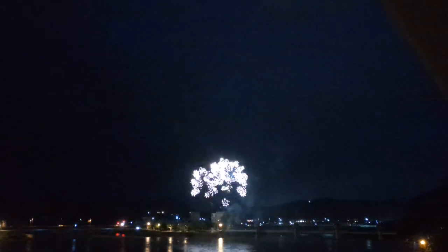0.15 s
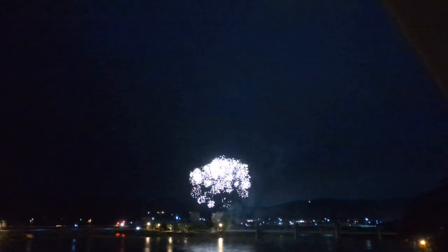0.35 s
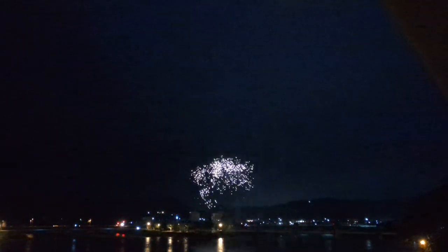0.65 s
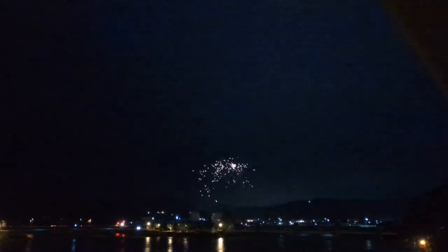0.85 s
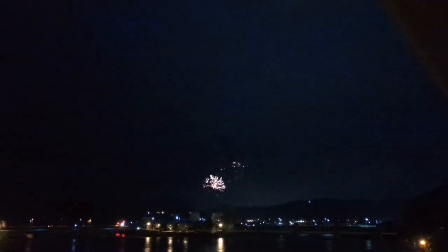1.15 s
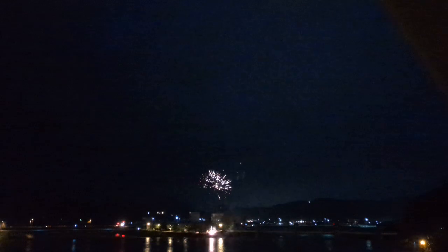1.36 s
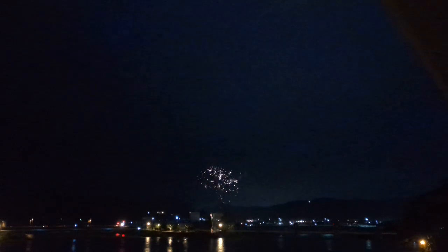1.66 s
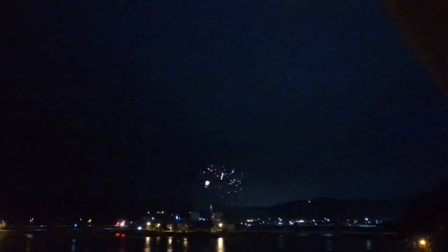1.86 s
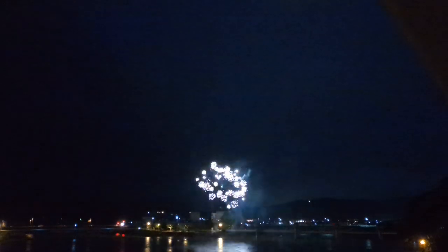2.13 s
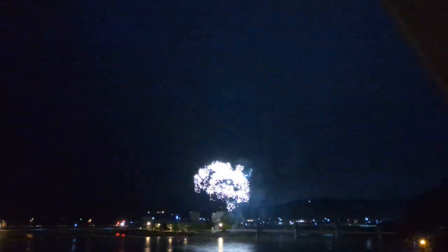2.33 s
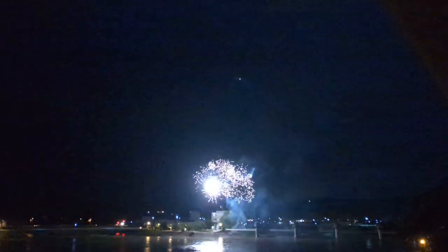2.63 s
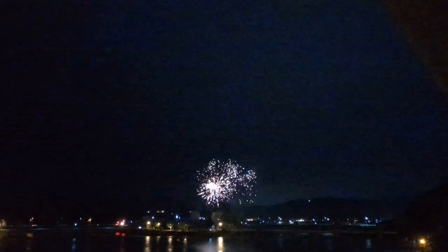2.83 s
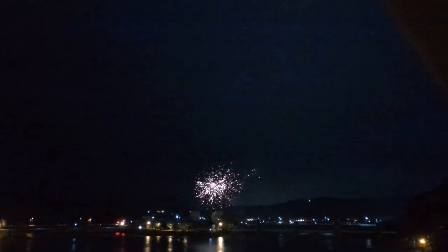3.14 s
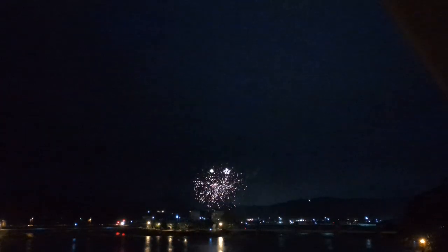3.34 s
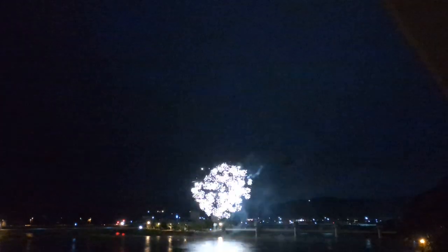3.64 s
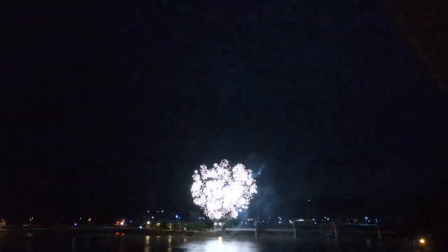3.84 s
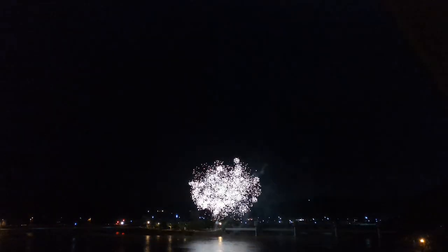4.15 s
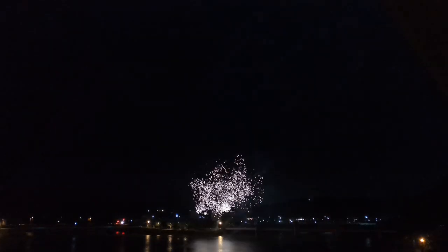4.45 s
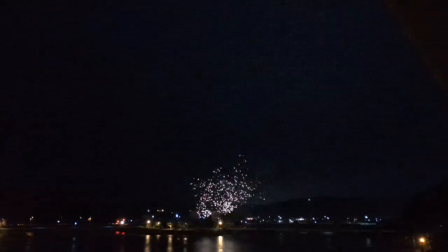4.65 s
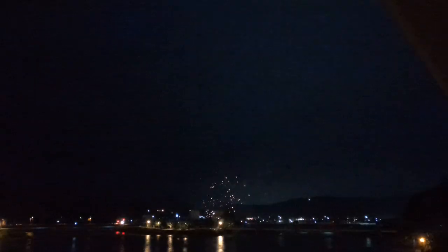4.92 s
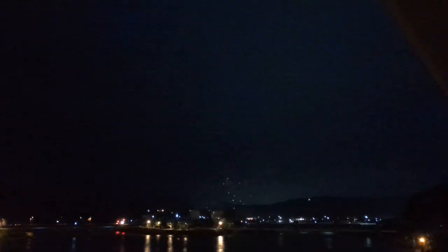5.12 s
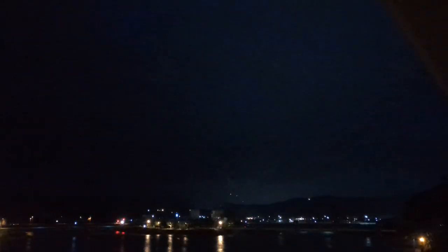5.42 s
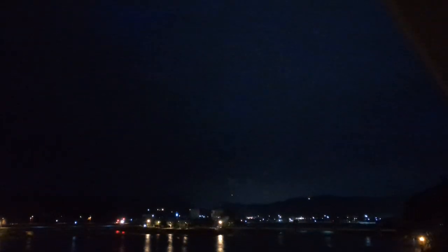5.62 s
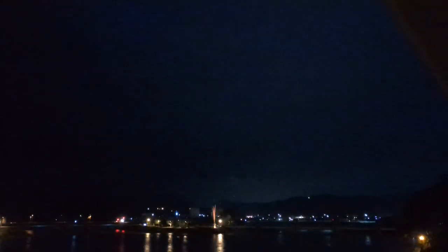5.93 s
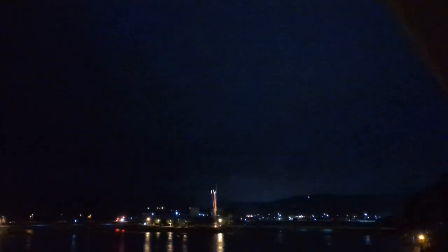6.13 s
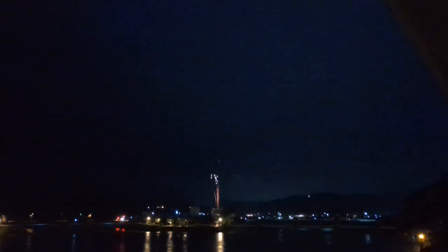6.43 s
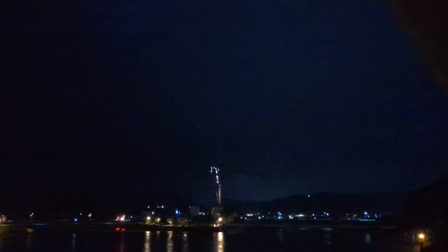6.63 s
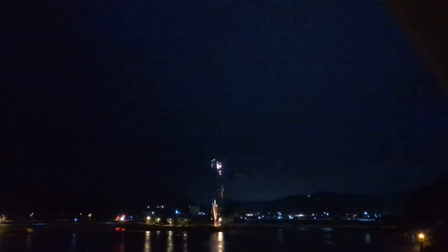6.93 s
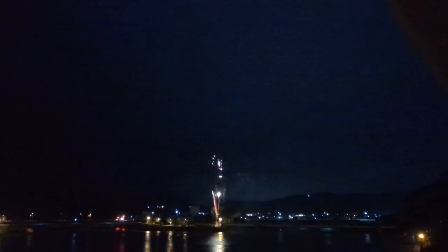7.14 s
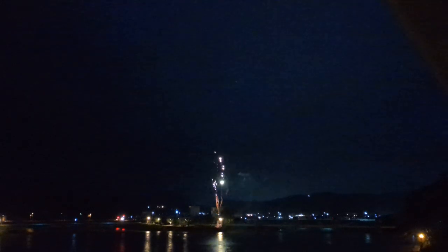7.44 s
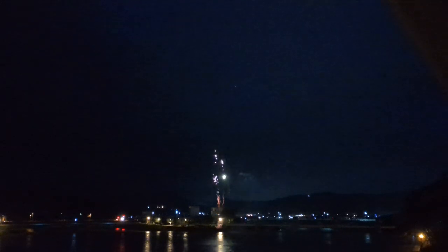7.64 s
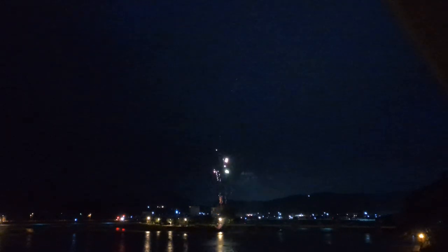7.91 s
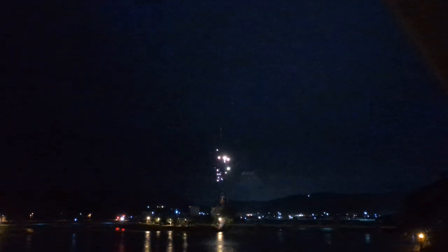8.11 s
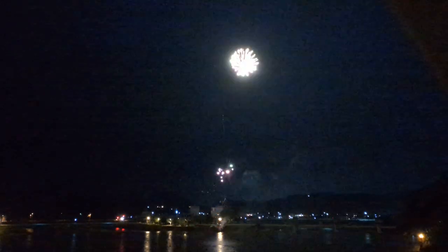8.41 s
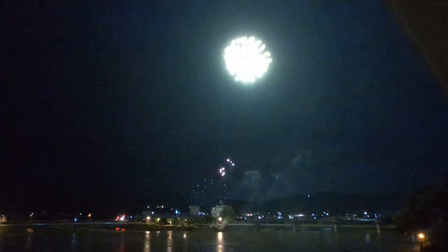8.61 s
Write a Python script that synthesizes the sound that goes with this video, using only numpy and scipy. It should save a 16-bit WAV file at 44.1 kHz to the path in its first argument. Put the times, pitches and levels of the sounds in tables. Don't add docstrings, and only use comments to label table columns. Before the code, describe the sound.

Firework shells burst far off over water in a wide valley, each bang trailing into a low rumble. Single booms come first, then an overlapping volley, then a loud shower of dry crackles and snapping pops. The noise sinks to a murmur with soft thumps from a ridge on the left. Finally a sharp launch knock, a muffled thump and a very heavy one echo away. Wide stereo, distant microphone, slight hiss.

```python
import sys
import numpy as np
from scipy import signal
from scipy.fft import rfft, irfft
from scipy.io import wavfile
from scipy.ndimage import uniform_filter1d

SR = 44100
rng = np.random.default_rng(int(sys.argv[2]) if len(sys.argv) > 2 else 0)


def persist_wave(psi):
    counts = np.round(np.clip(psi, -1, 1) * 32767).astype(np.int16)
    wavfile.write(sys.argv[1], SR, np.atleast_2d(counts).T)


def how_loud(loudness_db):
    steps = np.asarray(loudness_db, float) / 20
    return 10 ** steps


N = 386751

# start_s, crack_db, boom_db, thud_db, roll_db
SHELLS = [
    (0.0272, -21, -10.5, -29, -25.5),
    (2.054, -19, -14, -35.5, -19),
    (3.4933, -14.5, -23, -28, -21),
    (3.6068, -16, -16.5, -23, -20.5),
    (3.7854, -21, -13, -22, -20),
    (3.9365, -24, -12.5, -30.5, -22.5),
    (3.95, -22, -22, -20, -24.5),
]
# start_s, crack_db, boom_db, thud_db, roll_db
LIFTS = [
    (6.9012, -17.5, -26, -27.5, -33),
    (7.641, -40, -18.5, -16.5, -42),
    (7.837, -20, -7, -4.5, -32.5),
]
# start_s, snap_peak_db, boom_db
SHELL_RETURNS = [(0.346, -17.5, -18.5), (0.5918, -14, -12), (2.371, -16.5, -15.5), (2.407, -19.5, -21),
                 (2.4233, -19, -17), (2.441, -16, -34), (2.4647, -17, -23.5), (2.783, -26, -26),
                 (3.708, -10.5, -18.5), (3.89, -11.5, -17), (3.9164, -11.5, -16.5), (4.042, -17, -19),
                 (4.0981, -12.5, -12.5), (4.2445, -17, -14.5)]
# delay_s, then snap_db, boom_db, thud_db over the roll of the lift,
# boom_share (of the lift's boom over -17 dB)
HILL_ECHOES = [
    (.304, 18, 15.5, 18.5, 0.13),
    (.443, -1.5, 7, 14, 0.14),
    (.595, -14, -0.5, 7, -0.5),
    (.708, -9.5, 3, 9.5, 0),
    (0.829, -11, -4.5, 3, -0.5),
]
# start_s, snap_peak_db, boom_db
RIDGE = [
    (5.72, -48, -39),
    (5.80, -46, -39),
    (5.8812, -45, -34),
    (5.9563, -47, -31),
    (6.0212, -33.5, -28.5),
    (6.1105, -33.5, -30),
    (6.1515, -46, -32),
]
RIDGE_LEFT_DB = 14
# frequency_hz, density_db (per Hz)
THUD = [(15, -50.5), (25, -27), (46, -15.5), (70, 2), (130, -4.5), (160, -2.5), (210, -31), (350, -120)]
BOOM = [(82, -24), (140, -4), (219, -3.5), (268, -2.5), (317, 3.5), (357, -4.5), (547, -4.5), (950, -17.5),
        (1240, -16.5), (2090, -120)]
SNAP = [(320, -27.5), (550, -7.5), (740, -6), (1010, -9.5), (1210, -3), (1450, -6.5), (2030, -4.5),
        (2430, -4), (2800, -9.5), (3800, -15.5), (4400, -26), (5980, -36.5), (10100, -120)]
EDGE = [(2530, -38.5), (4300, -5), (5750, -1.5), (7040, -7.5), (8660, -12.5), (12400, -29), (14500, -41),
        (16400, -95)]
LIKENESS = [0.64, 1, 0.8, 0.12, 0.045]


def shells():
    # delay_ms, level_db
    sky_echoes = [
        (1.8, 8.5),
        (7.5, -1),
        (12, -8),
        (20, 0.5),
    ]
    # frequency_hz, density_db (per Hz)
    shell_snap = [(500, -72.5), (850, -7.5), (1320, -0.5), (1460, -4), (1730, -2.5), (2500, -3.5),
                  (4700, -15.5), (6110, -31), (10300, -120)]
    shell_edge = [(2530, -48), (4300, -6), (5820, -0.5), (7040, -7), (9010, -2), (15200, -18), (16400, -21)]
    rows = direct(SHELLS, snap_at_zero_db=-12, snap_per_db=0.13, trail_t60_s=0.15)
    return blasts(rows, sky_echoes, (THUD, BOOM, shell_snap, shell_edge), size=18000)


def lift_charges():
    # delay_ms, level_db
    ground_echoes = [
        (2.6, -4),
        (9, -10),
        (29.5, -11),
    ]
    # frequency_hz, density_db (per Hz)
    lift_boom = [(82, -53.5), (140, -3), (257, -5.5), (430, -9.5), (607, -12), (729, 1), (950, -45.5),
                 (1240, -77), (2090, -120)]
    lift_snap = [(380, -65.5), (650, 1.5), (754, 1), (936, -15), (1130, -1), (1460, -8), (1730, -7),
                 (2400, -5.5), (4700, -35), (6110, -42), (10300, -120)]
    muffled_db = -30
    rows = direct(LIFTS, snap_at_zero_db=3.6, snap_per_db=0.3, trail_t60_s=0.14)
    clear = [row for row in rows if row[4] > muffled_db]
    muffled = [row for row in rows if row[4] <= muffled_db]
    colours = (THUD, lift_boom, lift_snap, EDGE)
    out = blasts(clear, ground_echoes, colours, size=18000)
    return out + blasts(muffled, ground_echoes[:1], colours, size=14000, smeared=True)


def direct(table, snap_at_zero_db, snap_per_db, trail_t60_s):
    rows = []
    for s, crack_db, boom_db, thud_db, _ in table:
        snap_db = snap_at_zero_db + snap_per_db * crack_db
        t60 = trail_t60_s + 0.1 * min(crack_db + 22, 0)
        rows.append((s, snap_db, boom_db, thud_db, crack_db, t60))
    return rows


def blasts(table, echoes, colours, size, smeared=False):
    shock_db = [-2, 1, -1.93, 0.96]
    trail_db = [-35.5, -24.5, -23, -22.5]
    trail_scale = [5.3, 2.3, 1.36, 1.15]
    trail_likeness = [0.92, 0.76, 0.079, 0.096]
    smear_db = [-22, -19.5, -20.5, -17]
    smear_ms, rise_s = 4.13, 0.0008
    late_db, late_scale = -20.5, 5.2

    out, t = np.zeros((4, 2, N)), np.arange(size) / SR
    smear = t / (smear_ms / 1000)
    burst = smear * np.exp(1 - smear)
    for s, snap_db, boom_db, thud_db, edge_db, t60 in table:
        shock = np.zeros((2, size))
        shock[:, 0] = 1
        for ms, db in echoes:
            shock[:, int(ms * SR / 1000)] = how_loud(db + 1.5 * rng.standard_normal(2))
        a, b = grains(size, 1500, 2.36), grains(size, 1500, 3.0)
        for k, db in enumerate((thud_db, boom_db, snap_db, edge_db)):
            decay = np.log(1000) * t / (max(t60, 0.02) * trail_scale[k])
            two_stage = np.exp(-decay) + how_loud(late_db) * np.exp(-decay / late_scale)
            fade = how_loud(trail_db[k]) * two_stage
            scatter = pair(a, b, trail_likeness[k])
            if smeared:
                x = how_loud(-5.5 * k) * shock + (how_loud(smear_db[k]) * burst + fade) * scatter
            else:
                x = shock + fade * scatter
            add(out[k], s + rise_s, how_loud(db + shock_db[k]) * x)
    total = np.zeros((2, N))
    for x, table_hz_db in zip(out, colours):
        h = colour(table_hz_db)
        crest = h[np.abs(h).argmax()]
        total += through(x, h / crest)
    return total


def pops():
    # start_s, snap_peak_db
    stars = [(0.1082, -6), (0.1977, -11.5), (0.9483, -24), (1.005, -16.5), (1.045, -23), (1.089, -13.5),
             (1.175, -14), (1.3181, -9), (1.3925, -16), (1.46, -18), (1.4825, -18), (1.519, -17),
             (1.9494, -18), (1.965, -20.5), (3.031, -22), (3.0695, -16), (3.1212, -32), (3.3912, -6),
             (3.432, -10), (3.5885, -8.5), (4.4378, -19), (4.564, -11), (4.6034, -5), (4.813, -4.5),
             (4.8562, -5.5), (4.8996, -9), (4.9295, -4.5), (5.0932, -5), (5.2177, -27), (5.2807, -8)]
    rows = [(s, db - 0.5, db - 39.0, db - 54, db - 18.0, 0.06) for s, db in stars]
    return blasts(rows, [(1.39, -57)], (THUD, BOOM, SNAP, EDGE), size=5000)


def crackle(levels, share):
    share = np.clip(0.45 * share + 0.13, 0, 1)
    a, b = (np.sqrt(1 - share) * rng.standard_normal(N) + np.sqrt(share) * grains(N, 450, 4.9)
            for _ in range(2))
    return diffuse(levels, flicker(60, 1.65), a, b, LIKENESS[3:], (SNAP, EDGE))


def clouds(t):
    # first_s, full_s, thinning_s, full_db, first_under_full_db
    star_clouds = [
        (-0.05, 0.174, 0.2, -28.5, -0.5),
        (0.964, 1.18, 1.372, -29.5, -16),
        (3.02, 3.272, 3.357, -25, -25),
        (4.42, 4.47, 4.52, -42, -10),
        (4.554, 4.824, 5.272, -20, -4),
    ]
    lows_db = [-41, -16.5, -13.5]
    thinning_db_per_s, burnt_out_s = 57.5, 0.19
    power = np.zeros((5, len(t)))
    for first, full, thin, db, under_db in star_clouds:
        late = np.maximum(t - thin, 0)
        fill = np.clip((t - first) / (full - first), 0, 1)
        dying = late + 2 * np.maximum(late - burnt_out_s, 0)
        shape = db + under_db * (1 - fill) ** 2 - thinning_db_per_s * dying
        edge_db = -14 - 0.74 * max(db + 29, -1)
        offsets = np.array(lows_db + [0, edge_db])
        power += (t >= first) * how_loud(2 * (shape + offsets[:, None]))
    return power


def hills():
    # frequency_hz, density_db (per Hz)
    return_snap = [(530, -12), (900, -6), (1470, -3), (2290, -6.5), (3330, -13.5), (4010, -21), (4700, -18),
                   (6110, -33), (10300, -120)]
    return_boom = [(82, -37), (140, -8.5), (257, -8.5), (430, -6), (700, -5.5), (950, -12.5), (1240, -46),
                   (2090, -120)]
    hill_snap = [(600, -40), (1100, -1), (1500, -4), (2200, 1), (3500, -7), (6000, -17), (10300, -57.5)]

    def back(rows, boom_colour, snap_colour):
        colours = (THUD, boom_colour, snap_colour, EDGE)
        return blasts(returned(rows), [(2.2, -9)], colours, size=14000, smeared=True)

    off_shells = back([(s, snap, boom, boom - 24) for s, snap, boom in SHELL_RETURNS], BOOM, return_snap)
    lift_rows = []
    for s, _, own_boom, _, roll in LIFTS:
        for lag, *over_roll_db, share in HILL_ECHOES:
            lift_rows.append((s + lag, *(roll + share * (own_boom + 17) + np.array(over_roll_db))))
    off_lifts = back(lift_rows, return_boom, hill_snap)
    off_ridge = back([(s, snap, boom, boom + 1) for s, snap, boom in RIDGE], BOOM, return_snap)
    return off_shells + off_lifts + off_ridge * how_loud([[3], [4 - RIDGE_LEFT_DB]])


def returned(table):
    return [(s, snap, boom, thud, -21 + 1.25 * snap, 0.17)
            for s, snap, boom, thud in table if s < N / SR]


def valley():
    rise_s = [0.076, 0.014, .03, 0.12, 0.056]
    near_db_per_s = [25, 42, 40.5, 47.6, 80]
    far_db = [-5, -12, -9.5, -10, -9.5]
    far_db_per_s = [1.8, 6.4, 6.7, 15.7, 29]
    horizon_s = [2.1, 0.74, 0.79, .8, 0.87]
    beyond_db_per_s = [60, 14.6, 42, 13, 15]
    roll_of_shell_db = [-18.5, -0.5, 0, -6, -21]
    roll_of_lift_db = [1.5, -1, 2.5, -0.5, -18]
    roll_of_return_db = [-42, -23.5, -20.5, -26.5, -52]
    roll_of_ridge_db = [-30, -12, -22, -40, -60]
    roll_of_hill_db = [-14.5, -16.5, -22.5, -24, -57]
    roll_of_cloud_db = [-14, 1, 13.5, 4.5, 6.5]
    depth_share = [.8, 0.64, 0.075, 0.32, 0.028]
    town_db = [-58, -61.5, -51, -53.5, -97]
    hill_left_db_per_s = 13.5

    def column(values):
        return np.array(values, float)[:, None]

    t = np.arange(N // 64 + 2) * 64 / SR
    step_s = t[1]
    cloud = clouds(t)
    feed = np.repeat((cloud * how_loud(2 * column(roll_of_cloud_db)) * step_s)[:, None], 2, axis=1)
    arrivals = []
    for s, _, _, thud, roll in SHELLS:
        arrivals.append((s, roll + column(roll_of_shell_db) + column(depth_share) * (thud + 25)))
    for s, _, boom in SHELL_RETURNS:
        arrivals.append((s, boom + column(roll_of_return_db)))
    for s, _, boom in RIDGE:
        arrivals.append((s, boom + column(roll_of_ridge_db) + [0, -RIDGE_LEFT_DB]))
    for s, _, _, _, roll in LIFTS:
        arrivals.append((s, roll + column(roll_of_lift_db)))
        for lag, _, _, thud, _ in HILL_ECHOES:
            left = [0, -hill_left_db_per_s * lag]
            arrivals.append((s + lag, roll + thud + column(roll_of_hill_db) + left))
    for s, db in arrivals:
        feed[:, :, int(s / step_s)] += how_loud(2 * db)

    rise = 1 - np.exp(-t / column(rise_s))
    rise *= how_loud(-2 * column(beyond_db_per_s) * np.maximum(t - column(horizon_s), 0))
    near = rise * how_loud(-2 * column(near_db_per_s) * t)
    far = rise * how_loud(2 * (column(far_db) - column(far_db_per_s) * t))
    echo = signal.fftconvolve(feed, (near + far)[:, None], axes=2)[..., :len(t)]
    power = np.maximum(echo, 0) + (cloud + how_loud(2 * column(town_db)))[:, None]

    def fine(values):
        return np.interp(np.arange(N) / SR, t, values)

    levels = np.sqrt([[fine(p) for p in ports] for ports in power])
    return levels, fine(cloud[3] / power[3].mean(axis=0))


def rumble(levels):
    # frequency_hz, density_db (per Hz)
    roll_body = [(59, -38.5), (100, 0.5), (221, 0.5), (260, -5), (340, -23), (570, -120)]
    roll_boom = [(140, -37), (240, -9), (313, -2), (361, -2), (639, -9), (892, -24), (950, -17.5),
                 (1240, -33), (2090, -120)]
    lumps = flicker(14, 1.2)
    a, b = (0.81 * rng.standard_normal(N) + 0.48 * grains(N, 300, 4.0) for _ in range(2))
    return diffuse(levels, lumps, a, b, LIKENESS[:3], (THUD, roll_body, roll_boom))


def diffuse(levels, wander, a, b, likeness, colours):
    total = np.zeros((2, N))
    for gain, like, table in zip(levels, likeness, colours):
        total += through(gain * wander * pair(a, b, like), colour(table))
    return total


def colour(table, size=4096):
    hz, db = np.transpose(table)
    f = np.maximum(np.arange(size // 2 + 1) * SR / size, 1)
    log_gain = np.interp(np.log(f), np.log(np.maximum(hz, 1)), db) * np.log(10) / 20
    cepstrum = irfft(log_gain)
    cepstrum[1:size // 2] *= 2
    cepstrum[size // 2 + 1:] = 0
    h = irfft(np.exp(rfft(cepstrum)))
    return h / np.sqrt(np.sum(h ** 2))


def through(x, h):
    out, busy = np.zeros((2, N)), np.flatnonzero(x[0])
    sounding = x[:, busy[0]:busy[-1] + 1]
    add(out, (busy[0] + 0.5) / SR, signal.oaconvolve(sounding, h[None], axes=1))
    return out


def pair(a, b, like):
    like = np.clip(like, 0, 0.99)
    opposed = b * np.array([[1], [-1]])
    return np.sqrt((1 + like) / 2) * a + np.sqrt((1 - like) / 2) * opposed


def grains(size, rate, spread_db):
    chance = rng.random((3, size))
    db = spread_db * np.minimum(-np.log(1 - chance[1]), 3)
    x = (chance[0] < rate / SR) * how_loud(db) * np.sign(chance[2] - 0.5)
    return x / np.sqrt(np.mean(x ** 2) + 1e-18)


def flicker(rate, depth_db):
    k = int(SR / rate)
    held = np.repeat(rng.standard_normal(N // k + 1), k)
    return how_loud(depth_db * uniform_filter1d(held, k // 2)[:N])


def add(bus, s, x):
    i = int(s * SR)
    bus[:, i:i + x.shape[1]] += x[:, :N - i]


def scene():
    bursts = shells() + lift_charges() + hills()
    levels, share = valley()
    stars = crackle(levels[3:], share) - pops()
    return bursts + stars + rumble(levels[:3])


def band_limit(x):
    return signal.sosfilt(signal.butter(12, 16550, fs=SR, output="sos"), x)


def record(dry):
    # frequency_hz, left_minus_right_db
    ports = [(60, -8), (110, 4), (200, -1.5), (380, -1), (700, -0.5), (1290, 0.5), (2380, -7.5), (4400, -2),
             (8120, 1), (15000, -1)]
    # frequency_hz, density_db (per Hz)
    hiss = [(2060, -36), (3500, -5.5), (5930, -12), (7750, -19.5), (8970, -28.5), (16000, -32)]
    tilt = [colour([(hz, sign * db / 2) for hz, db in ports], size=512) for sign in (1, -1)]
    x = np.array([signal.fftconvolve(c, h)[:N] for c, h in zip(dry, tilt)])
    x[1] = np.roll(x[1], 2)
    x += through(how_loud(-66.5) * rng.standard_normal((2, N)), colour(hiss))
    x = signal.sosfilt(signal.butter(3, 43.3, "high", fs=SR, output="sos"), x)
    x = signal.sosfilt(signal.ellip(8, 0.2, 60, 15900, fs=SR, output="sos"), x)
    x = np.clip(x, -0.98, 0.98)
    return band_limit(x)


dry = scene()
out = record(dry)
persist_wave(out)
```